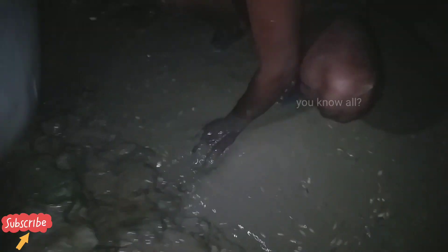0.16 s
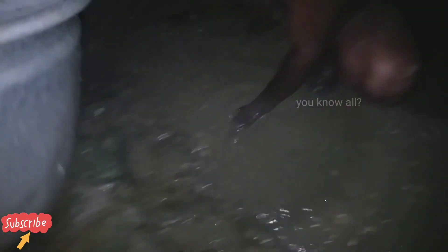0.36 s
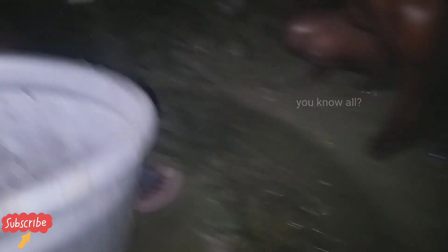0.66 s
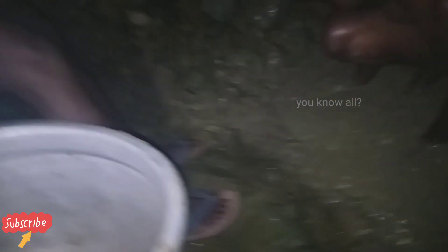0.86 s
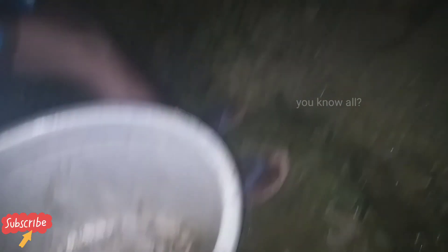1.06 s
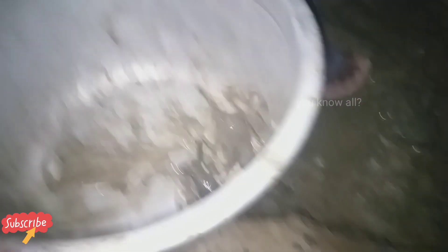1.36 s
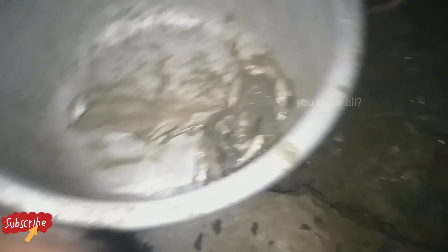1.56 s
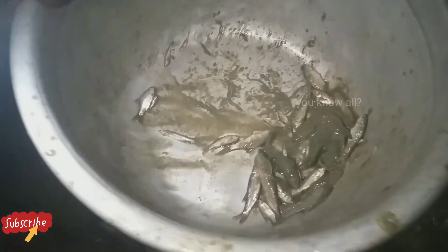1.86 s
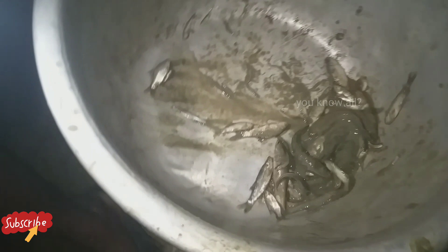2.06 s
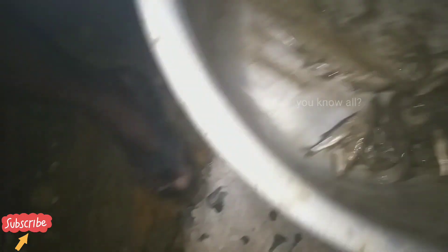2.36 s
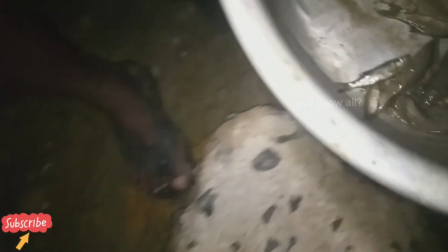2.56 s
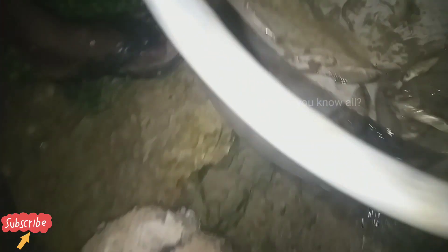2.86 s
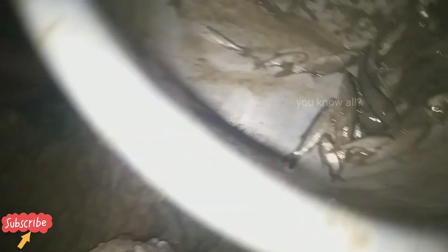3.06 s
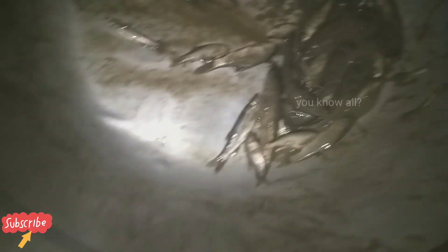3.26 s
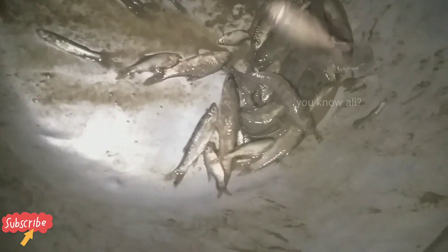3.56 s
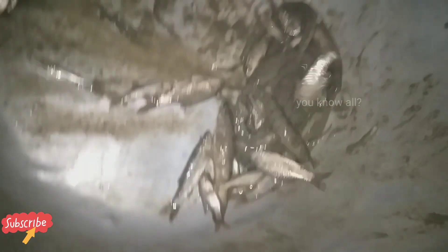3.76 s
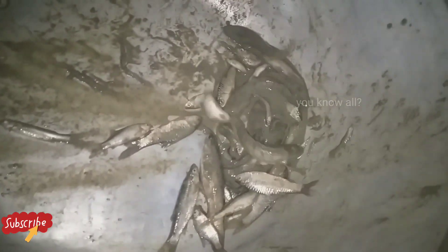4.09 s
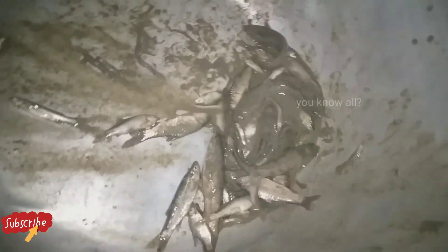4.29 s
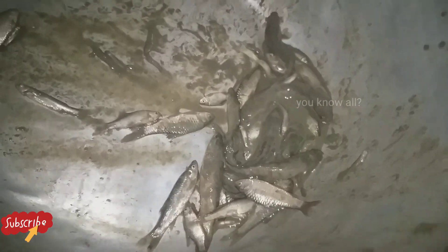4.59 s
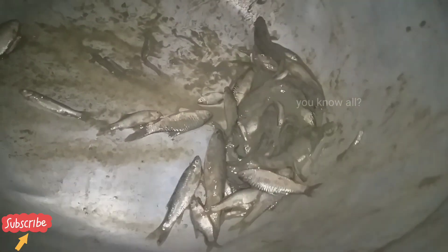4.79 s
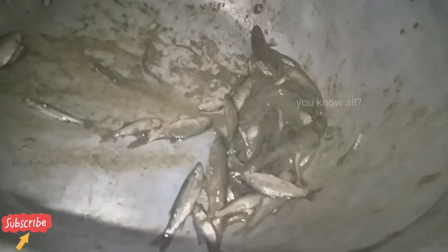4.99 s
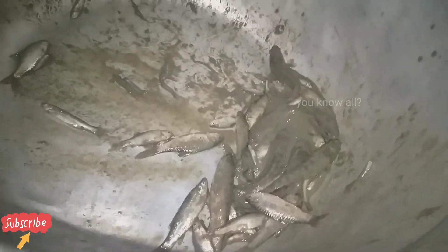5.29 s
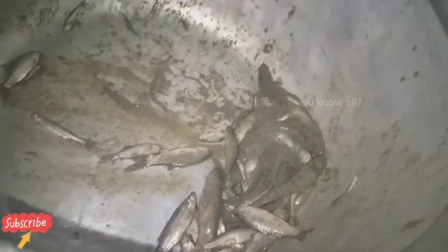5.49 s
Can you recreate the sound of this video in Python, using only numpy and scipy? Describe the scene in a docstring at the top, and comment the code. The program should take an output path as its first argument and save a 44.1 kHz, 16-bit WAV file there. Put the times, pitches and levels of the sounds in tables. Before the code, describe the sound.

At night outdoors, heard through a handheld phone. From about 0.1 s a hand sweeps through shallow water, with the strongest splash near 0.35 s, a spray of droplets and small bubbles. Short, hard stone clacks follow at 0.55 to 0.7 s, with a little drip. Around 0.9 to 1.3 s fingers bump the case in dull, low thuds, one heavy near 1.1 s, while lapping water fades away. Scratchy rubbing bursts come at 1.65 and 1.95 s, then thicken from 2.3 to 3 s, with two very loud stone clacks near 2.5 s and a hard knock at 2.6 s. More thumps, clicks and gritty scraping crowd 3.3 to 4 s, with a watery plip near 3.4 s. After about 4.2 s it calms: a wavering low motor hum, clearer now, over a soft rumble and faint hiss, sparse fine ticks, small drips around 4.6 s and faint fluttering wet crackles of fish until the end.

```python
"""Night water, stones and fish

At night a hand sweeps through shallow water and stones clack, while a phone is carried over a basin of small fish.
Fingers rub, tick and bump the phone's case: random slips and short blows make its shell ring close by.
The water is a spray of tiny grains and rising bubbles; the stones are short falling tones.
Later the fish wriggle faintly as a wet crackle; a far motor hums on as wavering tones over a soft low rumble of air."""
import sys
import numpy as np
from scipy import signal
from scipy.fft import rfft, irfft
from scipy.io import wavfile
from scipy.ndimage import uniform_filter1d

SR = 44100
rng = np.random.default_rng(int(sys.argv[2]) if len(sys.argv) > 2 else 0)


def dump_mix(stems):
    """Bounce the given channels to the path in sys.argv[1] as a 16-bit WAV at rate SR."""
    frames = np.atleast_2d(stems).T  # one column per channel
    limited = np.clip(frames, -1, 1)  # hard clip at full scale
    pcm = np.round(limited * 32767).astype(np.int16)
    wavfile.write(sys.argv[1], SR, pcm)


N = 248724
TIME = np.arange(N) / SR


def undb(db):
    """Turn decibels into a gain."""
    return 10 ** (np.asarray(db) / 20)


def unit(x):
    """Scale a sound to an rms of 1."""
    return x / np.sqrt(np.mean(x ** 2))


def add(track, s, sound):
    """Mix a sound into the track at time s."""
    i = int(s * SR)
    part = sound[:max(N - i, 0)]
    track[i:i + len(part)] += part


def ring(x, response):
    """Let a signal set off a ringing object, given the object's answer to one click."""
    return signal.fftconvolve(x, response)[:len(x)]


def colour(x, points, size=4096):
    """Shape the tone to an outline of (frequency [Hz], level [dB]), never sounding ahead of its input."""
    hz, db = np.transpose(points)
    f = np.maximum(np.fft.rfftfreq(size, 1 / SR), 1)
    outline_db = np.interp(np.log(f), np.log(hz), db)
    # folding the cepstrum gives the filter its earliest possible response
    cepstrum = irfft(np.log(undb(outline_db)))
    cepstrum[1:size // 2] *= 2
    cepstrum[size // 2 + 1:] = 0
    return ring(x, irfft(np.exp(rfft(cepstrum))))


def cut(x, hz, kind, order=4):
    """Keep only the lows, the highs or a band (Butterworth filter)."""
    return signal.sosfilt(signal.butter(order, hz, kind, fs=SR, output="sos"), x)


def fade(t, t60):
    """Die away smoothly, by 60 dB in t60 seconds."""
    return np.exp(-np.log(1000) * t / t60)


def walk(rate):
    """Wander smoothly at random, with an rms of 1."""
    k = int(SR / rate)
    steps = np.repeat(rng.standard_normal(N // k + 1), k)
    return unit(uniform_filter1d(steps, k)[:N])


def grains(rate, spread_db):
    """Scatter tiny clicks of uneven size, about `rate` per second, with an rms of 1."""
    size = undb(spread_db * np.clip(rng.standard_normal(N), -2, 2))
    return unit((rng.random(N) < rate / SR) * rng.choice([-1, 1], N) * size)


def gesture(s, length, attack, t60):
    """Follow one movement as a gain: it rises, holds for its length and dies away."""
    return np.clip((TIME - s) / attack, 0, 1) * fade(np.clip(TIME - s - length, 0, 3 * t60), t60)


# far motor's tones, before their slow swell: (frequency [Hz], rms level [dB])
MOTOR_TONES = [(63.1, -62), (113.0, -52.5), (126.2, -46.5), (169.2, -64.5)]
# tone of the still night air: (frequency [Hz], relative level [dB])
AIR_COLOUR = [(20, -39), (40, -14), (62, 1), (90, 8.5), (125, 13.5), (200, -3), (280, -28), (500, -12),
              (1100, -48.5), (2000, -43), (2700, -62), (4600, -14.5), (7000, -31.5), (10000, -34),
              (14500, -16)]
AIR_DB = -52


def night():
    """A far motor's tones waver in level and phase over a soft low rumble of air with a faint hiss."""
    hum = 0
    for hz, db in MOTOR_TONES:
        phase = 2 * np.pi * (hz * TIME + rng.random()) + 0.14 * walk(2.1)
        hum = hum + undb(db + 0.76 * walk(4.5)) * np.sqrt(2) * np.sin(phase)
    # the hum grows as the phone turns toward the basin
    facing = undb(np.interp(TIME, [0, .7, 1.1, 4.1], [-11, -8, -3.5, 1]))
    air = unit(colour(rng.standard_normal(N), AIR_COLOUR)) * undb(AIR_DB + 0.66 * walk(11))
    return hum * facing + air


# clear ringing tones of the case: (frequency [Hz], relative level [dB], 60 dB fade [s])
CASE_MODES = [(202.4, 3, 0.28), (257.2, 4.5, 0.095), (298, 1, 0.15), (609, -0.5, .11), (680, -14.5, 0.061),
              (990, -19, 0.26), (973, -21.5, 0.041), (1077, -1.5, 0.041), (1319.5, -3, 0.19),
              (1495, -7.5, 0.043), (1820, -11.5, 0.29), (2042, -6.5, 0.12), (2778, -5, 0.066),
              (2985, -11.5, 0.091), (3680, -5.5, 0.067), (4310, 1, 0.064), (4500, -6.5, 0.069)]
# outline of its many short overlapping tones: (frequency [Hz], relative level [dB])
CASE_COLOUR = [(40, -9.5), (135, -2.5), (190, 6.5), (310, -9), (375, -22.5), (480, -13.5), (650, -9),
               (850, -16.5), (1400, -7.5), (2300, -14), (4600, -5.5), (5500, -16), (7400, -41.5),
               (16000, -59.5)]
# fine crackle of skin on the case: (frequency [Hz], relative level [dB])
GRIT_COLOUR = [(5000, -17.5), (7300, -24), (8600, -23), (9800, -32.5), (11000, -14), (12300, -1.5),
               (14200, 1), (16000, 0.5)]


def case_responses(dense_t60=0.045, modes_db=-29, mode_scatter_db=1.0, grit_t60=0.018,
                   split_hz=450, lowest_hz=75, size=10000):
    """The case answers a slip at one random spot: low flexing, ringing shell and fine grit, each of energy 1."""
    t = TIME[:size]
    dense = colour(rng.standard_normal(size) * fade(t, dense_t60), CASE_COLOUR)
    modes = 0
    for hz, db, t60 in CASE_MODES:
        # every spot wakes the modes with its own strength and sign
        strength = rng.choice([-1, 1]) * undb(db + mode_scatter_db * rng.standard_normal())
        modes = modes + strength * np.cos(2 * np.pi * hz * t) * fade(t, t60)
    body = cut(dense + undb(modes_db) * cut(modes, 3800, "low"), lowest_hz, "high", order=3)
    flex = cut(body, split_hz, "low", order=6)
    shell = cut(body, split_hz, "high")
    grit = colour(rng.standard_normal(size) * fade(t, grit_t60), GRIT_COLOUR)
    return [r / np.linalg.norm(r) for r in (flex, shell, grit)]


# fingers' uneven creep on the case as the phone is carried, before its spurts: (time [s], rub level [dB])
CREEP = [(0, -47.5), (.09, -70), (.3, -54), (.55, -50.5), (1.25, -49), (1.56, -44), (1.86, -48), (2.1, -43),
         (2.6, -51.5), (3.12, -43.5), (3.22, -64.5), (3.5, -42.5), (4.1, -46.5), (4.28, -59.5),
         (4.6, -53.5), (4.85, -59.5), (5.36, -67), (5.64, -59.5)]
CREEP_SHUDDER_DB, CREEP_GRIT_DB = -3, 0  # relative to the rub
CREEP_DB, CREEP_PER_S = 3, 45  # size and rate of its small spurts
# finger strokes across the case, before the slips make them uneven:
# (time [s], held length [s], rub level [dB], low shudder level [dB], fine grit level [dB])
STROKES = [(0.126, .05, -45.5, -75, -53), (0.173, 0.031, -29.5, -71, -35.5),
           (0.204, 0.095, -35.5, -68, -39), (0.494, 0.66, -42, -46.5, -54), (1.022, 0.12, -36.5, -36, -58),
           (1.195, 0.27, -57, -42, -64), (1.609, 0.029, -46, -32, -55), (1.655, 0.085, -26.5, -30.5, -23.5),
           (1.897, 0.018, -32.5, -36, -28), (1.953, 0.029, -28.5, -23, -21),
           (2.155, 0.14, -36.5, -40.5, -34), (2.314, 0.13, -21.5, -25.5, -24),
           (2.363, 0.011, -16, -25, -17.5), (2.53, 0.041, -37.5, -42, -40), (2.629, 0.082, -22.5, -19, -27),
           (2.72, 0.25, -29.5, -27, -33.5), (2.787, 0.015, -22.5, -26, -26.5),
           (2.941, 0.047, -24.5, -28, -26), (2.982, 0.038, -23.5, -20, -33), (3.484, 0.047, -37, -25, -42),
           (3.535, 0.014, -21, -19, -31), (3.584, 0.098, -24.5, -22.5, -31.5),
           (3.689, 0.12, -20.5, -20.5, -27), (3.811, 0.11, -21.5, -26, -28),
           (3.926, 0.056, -30.5, -33, -34), (4.049, 0.015, -48, -40.5, -51), (4.17, 0.0064, -29, -39, -40),
           (4.496, 0.04, -43, -60, -43)]
STROKE_ATTACK_S, STROKE_T60_S = 0.01, 0.12


def fingers():
    """Finger strokes add their power to the uneven creep of the grip: gains of shudder, rub and grit."""
    creep = undb(np.interp(TIME, *np.transpose(CREEP))) * undb(CREEP_DB * walk(CREEP_PER_S))
    power = (creep * undb([[CREEP_SHUDDER_DB], [0], [CREEP_GRIT_DB]])) ** 2
    for s, length, rub_db, shudder_db, grit_db in STROKES:
        stroke = gesture(s, length, STROKE_ATTACK_S, STROKE_T60_S)
        power += undb([[shudder_db], [rub_db], [grit_db]]) ** 2 * stroke ** 2
    return np.sqrt(power)


def rubbing(roam_db=8, shudder_db=-1.5, flex_low_hz=175, flex_high_hz=335,
            groan_db=-4, groan_top_hz=1380, count=8):
    """Skin sticks and slips in uneven spurts, while the point of contact roams between several spots."""
    low_gain, rub_gain, grit_gain = fingers()
    slips = grains(rate=3600, spread_db=6.0) * unit(undb(2.12 * walk(130)))
    sharp_slips = unit(slips * undb(3.3 * walk(200)))
    shares = np.array([undb(roam_db * walk(28)) for _ in range(count)])
    shares /= np.linalg.norm(shares, axis=0)
    shudder, scrape = 0, 0
    for share in shares:
        flex, shell, grit = case_responses()
        shudder = shudder + ring(slips * share, flex)
        # firm pressure also makes the lower ring of the shell groan
        groan = ring(slips * share * low_gain * undb(groan_db), cut(shell, groan_top_hz, "low"))
        rub = ring(slips * share * rub_gain, shell)
        crackle = ring(sharp_slips * share * grit_gain, grit)
        scrape = scrape + groan + rub + crackle
    # the case flexes in a narrow range, and the finger's pressure keeps that flexing at an even strength
    shudder = cut(cut(shudder, flex_high_hz, "low", order=8), flex_low_hz, "high", order=4)
    shudder = shudder / np.sqrt(uniform_filter1d(shudder ** 2, int(0.022 * SR)) + 1e-9)
    return shudder * low_gain * undb(shudder_db) + scrape


# sweeps of the hand through the water: (time [s], held length [s], level [dB])
SWEEPS = [(0.115, 0.18, -43.5), (0.324, 0.031, -29.5), (0.36, 0.078, -25), (0.657, 0.017, -34.5)]
SWEEP_ATTACK_S, SWEEP_T60_S = .008, 0.14
LAP_DB, TURN_AWAY_S, LAP_FALL_DB_PER_S = -50.5, 1.36, -26  # lapping fades as the phone turns away


def stirring():
    """Each sweep tears the water up, and it laps on in between: the gain of the water."""
    sweeps = sum(undb(db) * gesture(s, length, SWEEP_ATTACK_S, SWEEP_T60_S) for s, length, db in SWEEPS)
    lapping = undb(LAP_DB + LAP_FALL_DB_PER_S * np.maximum(TIME - TURN_AWAY_S, 0))
    return np.hypot(sweeps, lapping)


def bubble(hz, t60, glide=0.25, size=3000):
    """A trapped bubble rings and rises in pitch as it fades."""
    t = TIME[:size]
    tone = np.sin(2 * np.pi * hz * t * (1 + glide * t / t60 / 2))
    return tone * fade(t, t60) * (1 - fade(t, 0.0024))


# tone of the spray: (frequency [Hz], relative level [dB])
WATER_COLOUR = [(40, -29), (150, -7), (400, -5), (750, -1), (1400, 0), (2000, -0.5), (2700, -9.5),
                (4500, -8.5), (6500, -18.5), (9300, -36), (12500, -16.5), (16000, -33)]
# single drips and bubbles, before their soft onset: (time [s], level [dB], starting pitch [Hz], 60 dB fade [s])
DRIPS = [(.738, -32, 1490, 0.039), (1.49, -27, 2690, 0.031), (2.167, -29.5, 2070, 0.048),
         (3.381, -15, 945, 0.0089), (3.533, -25, 2500, 0.06), (4.505, -49, 1020, 0.044),
         (4.607, -43, 550, 0.038), (4.696, -40.5, 980, 0.026)]


def water(bubble_db=-9, cycles=14, count=900):
    """Torn water makes a spray of droplets and small bubbles, with a few clear drips."""
    spray = unit(colour(grains(rate=3000, spread_db=4.5), WATER_COLOUR))
    bubbles, drips = np.zeros(N), np.zeros(N)
    for when, pitch, strength in rng.random((count, 3)):
        hz = 600 * 4 ** pitch
        add(bubbles, when * N / SR, undb(-16 * strength) * bubble(hz, cycles / hz, size=1200))
    for s, db, hz, t60 in DRIPS:
        add(drips, s, undb(db) * bubble(hz, t60))
    return (spray + undb(bubble_db) * unit(bubbles)) * stirring() + drips


# wet stones clacking together, with the base of the falling pitch:
# (time [s], tone's peak level [dB], base pitch [Hz], 60 dB fade [s], snap level relative to the tone [dB])
CLACKS = [(0.541, -28, 1900, 0.0039, 0), (.569, -14, 1680, 0.00064, -3.5), (0.6368, -7, 1130, 0.0042, -14),
          (.674, -31, 1360, 0.0057, -18), (0.7184, -11, 1650, 0.0033, -9.5), (2.4716, 3, 1320, 0.0026, -28),
          (2.5176, -1.5, 1310, 0.0036, -17)]


def stones(rise=0.00031, sag=0.58, snap_hz=5200, snap_t60=0.0051, scatter_db=-31, scatter_t60=0.045, size=4000):
    """Each clack is a very short falling tone with a snap, scattered faintly by the bank."""
    out, t = np.zeros(N), TIME[:size]
    for s, db, hz, t60, snap_db in CLACKS:
        falling_hz = hz * (1 + sag * (2 * fade(t, t60) - .5))
        phase = 2 * np.pi * np.cumsum(falling_hz) / SR
        clack = np.sin(phase) * fade(t, t60) * (1 - np.exp(-(t / rise) ** 2))
        snap = undb(snap_db) * np.sin(2 * np.pi * snap_hz * t) * fade(t, snap_t60)
        scatter = unit(colour(rng.standard_normal(size), WATER_COLOUR)) * fade(t, scatter_t60)
        add(out, s, undb(db) * (clack / np.abs(clack).max() + snap + undb(scatter_db) * scatter))
    return out


def contact(response, length, window=0.007):
    """A blow chatters for a moment; its ring is scaled to start near rms 1."""
    t = TIME[:len(response)]
    y = ring(rng.standard_normal(len(t)) * np.exp(-(t / length) ** 2), response)
    return y / np.sqrt(np.sum(y ** 2) / (window * SR))


# bumps on the case, with levels before the shared trim of the hard parts: (time [s], thud level [dB],
# thud pitch [Hz], thud 60 dB fade [s], knock level [dB], edge level [dB], contact length [s])
BUMPS = [(.936, -11.5, 254.5, 0.12, -8, -11.5, 0.015), (1.030, -22, 286, 0.057, -30, -19.5, 0.009),
         (1.131, 2, 215, .032, -16, -29.5, .017), (1.29, -7, 200, 0.034, -30.5, -32.5, 0.022),
         (1.662, -15.5, 194, 0.25, -34, -12, 0.045), (1.944, -15, 235, .08, -20, -16, 0.014),
         (1.97, -9.5, 206, 0.048, -51, -21, 0.0015), (2.635, -0.5, 244, 0.096, -6, -2, 0.022),
         (2.883, -16, 264, 0.19, -17, -46.5, 0.0054), (3.345, -3.5, 163, 0.042, -18, -16, 0.021),
         (3.404, -15, 192, 0.12, -19.5, -16.5, .014), (3.488, -10.5, 224, 0.045, -21.5, -18, 0.018),
         (3.578, -8.5, 190, 0.059, -34, -22.5, .0059), (3.729, 0, 153, 0.029, -37, -40, 0.0049),
         (3.761, -7.5, 202.7, 0.16, -16, -8, 0.024), (3.8375, -12.5, 310, 0.18, -27.5, -6.5, 0.009),
         (3.961, -9, 233, 0.069, -39, -38, 0.0051), (4.057, -32, 206, 0.19, -31, -35, .022),
         (4.337, -19.5, 225, .098, -45, -73, 0.0042)]
# a harder contact sends its knock higher: (hardness, edge over thud [dB], knock's upper limit [Hz])
KNOCK_REACH = [(-30, 480), (2, 2180)]
BUMP_GRIT_DB = -13.5  # relative to the edge


def bumps(edge_hz=2400, rise=0.0026, bump_db=-7.0, lowest_hz=95, hollow_hz=307, hollow_db=-4,
          octave_db=0, swell=0.016, hollow_t60=0.14):
    """A fingertip pushes the case into a thud; harder contacts also wake its knock, edge and grit."""
    out = np.zeros(N)
    for s, thud_db, hz, t60, knock_db, edge_db, length in BUMPS:
        knock_hz = np.interp(edge_db - thud_db, *np.transpose(KNOCK_REACH))
        _, shell, grit = case_responses()
        t = TIME[:len(shell)]
        push = -np.sin(2 * np.pi * hz * t) * fade(t, t60) * (1 - np.exp(-t / rise))
        thud = cut(push, lowest_hz, "high", order=2)
        knock = undb(knock_db) * contact(cut(shell, knock_hz, "low"), length)
        edge = undb(edge_db) * contact(cut(shell, edge_hz, "high", order=2), length)
        crackle = undb(edge_db + BUMP_GRIT_DB) * contact(grit, length)
        # a hollow resonance and its octave swell just after the knock
        phase = 2 * np.pi * hollow_hz * t
        hollow = np.sin(phase) + undb(octave_db) * np.sin(2 * phase)
        hollow = hollow * (1 - np.exp(-(t / swell) ** 2)) * fade(t, hollow_t60)
        hard = undb(bump_db) * (knock + edge + crackle)
        add(out, s, undb(thud_db) * thud + hard + undb(knock_db + hollow_db) * hollow)
    return out


# clear ticks of the case under the fingers, with levels before the shared trim:
# (time [s], edge level [dB], centre pitch [Hz], grit level [dB])
TICKS = [(1.334, -29.5, 3900, -46), (1.537, -32, 2570, -49), (1.664, -28, 4400, -17.5),
         (1.834, -28, 4320, -34), (1.889, -36, 4480, -30), (2.548, -38, 4880, -21), (2.57, -26, 2820, -20),
         (2.702, -40, 4100, -16.5), (2.84, -34, 5000, -15.5), (3.159, -23, 4660, -45),
         (3.26, -61, 4980, -22.5), (3.346, -15, 4340, -16), (3.839, -8.5, 4430, -35),
         (4.119, -31, 2860, -23), (4.254, -38.5, 5300, -27), (4.409, -31, 4450, -23),
         (4.523, -17.5, 3700, -16.5), (4.564, -44, 2500, -25), (4.633, -63, 4240, -25),
         (4.695, -33.5, 4700, -33), (4.85, -46, 4500, -36), (5.055, -42, 4930, -40),
         (5.219, -51, 4890, -32), (5.549, -43, 4720, -21), (5.624, -26.5, 2850, -34)]


def ticks(tick_db=-6, length=0.00049, sharpness=4.4, t60=0.26, lowest_hz=1300):
    """Lone slips give a sharp first snap, then a short ring with its own centre pitch, damped by the finger."""
    out = np.zeros(N)
    snap = cut(colour(signal.unit_impulse(256), GRIT_COLOUR), 4000, "high", order=1)
    snap *= undb(8) / np.abs(snap).max()
    for s, edge_db, hz, grit_db in TICKS:
        _, shell, grit = case_responses()
        damping = fade(TIME[:len(shell)], t60)
        edge = cut(signal.lfilter(*signal.iirpeak(hz, sharpness, fs=SR), shell), lowest_hz, "high")
        add(out, s, undb(edge_db) * contact(edge * damping, length))
        add(out, s, undb(grit_db) * contact(grit * damping, length))
        add(out, s, undb(grit_db) * snap)
    return undb(tick_db) * out


PALM_S, PALM_LENGTH_S, PALM_DB, PALM_LOW_HZ, PALM_HIGH_HZ = 3.56, .2, -24, 100, 210


def palm():
    """The palm presses and drags over the case, which flexes in soft, deep slips."""
    flex = unit(cut(grains(rate=900, spread_db=2), [PALM_LOW_HZ, PALM_HIGH_HZ], "band", order=2))
    return undb(PALM_DB) * flex * gesture(PALM_S, PALM_LENGTH_S, STROKE_ATTACK_S, STROKE_T60_S)


# fish wriggling in the basin, before the flapping: (time [s], level [dB], held length [s])
WRIGGLES = [(4.354, -43.5, 0.014), (4.497, -56, 0.094), (4.708, -47, 0.027), (4.816, -64, 0.022),
            (4.951, -47, 0.013), (5.143, -54, 0.062), (5.403, -45, 0.021), (5.446, -43, 0.072)]
WRIGGLE_T60_S, FLAP_HZ, FLAP_DB = .11, 41.7, 4.5
# slithering, with the basin's low ring: (frequency [Hz], relative level [dB])
FISH_COLOUR = [(60, -52), (160, 0), (206, 22.5), (260, 9), (450, -14), (1100, -14.5), (1600, -2), (2150, 5),
               (2900, -20), (4000, -0.5), (5500, -23), (9000, -56), (14000, -11)]


def fish(attack=0.002):
    """Wet bodies slither and flutter over each other and softly ring the basin."""
    effort = 0
    for s, db, length in WRIGGLES:
        flapping_db = FLAP_DB * np.cos(2 * np.pi * FLAP_HZ * (TIME - s))
        effort = effort + undb(db + flapping_db) * gesture(s, length, attack, WRIGGLE_T60_S)
    crackle = grains(rate=3500, spread_db=-1)
    return colour(crackle * effort, FISH_COLOUR) / colour(crackle, FISH_COLOUR).std()


def scene():
    """All the sounds add up, the same for both ports of the phone."""
    near = night() + rubbing() + water() + stones() + bumps() + ticks() + palm() + fish()
    return np.array([near, near])


TOP_HZ = 15550


def record(dry, spread_db=-22.0, size=200):
    """The left port is a little louder in the midrange and the two differ; the phone clips and cuts the top."""
    lean = undb(-19) * cut(dry[0], [1120, 2300], "band", order=3)
    middle = cut(cut(dry[0], 1300, "high", order=6), 2000, "low", order=1)
    smear = unit(rng.standard_normal(size) * np.hanning(size)) / np.sqrt(size)
    spread = ring(middle, smear)
    # what is added on the left is taken away on the right
    ports = dry + (lean + undb(spread_db) * spread) * np.array([[1], [-1]])
    top_cut = signal.ellip(10, .2, 90, TOP_HZ, fs=SR, output="sos")
    return signal.sosfilt(top_cut, np.clip(ports, -.95, .95))


dry = scene()
out = record(dry)
dump_mix(out)
```